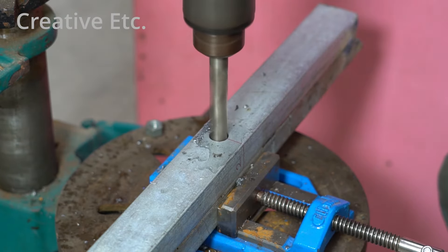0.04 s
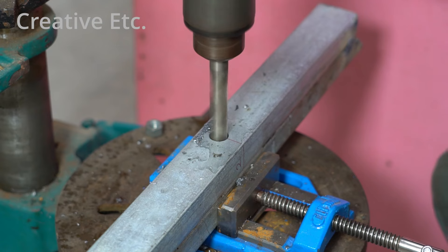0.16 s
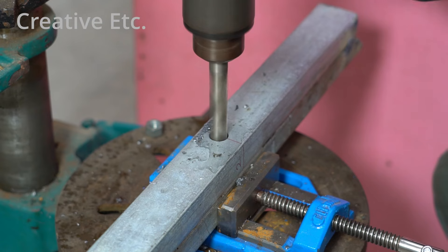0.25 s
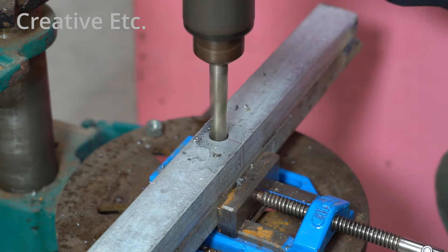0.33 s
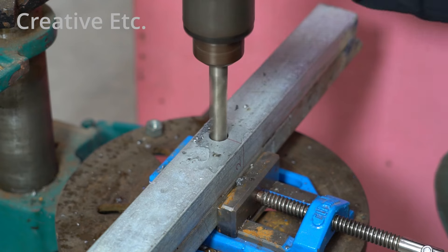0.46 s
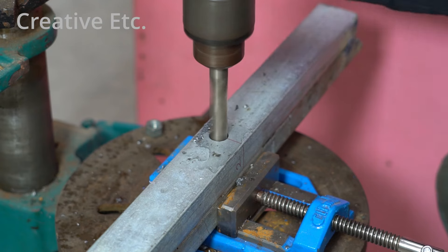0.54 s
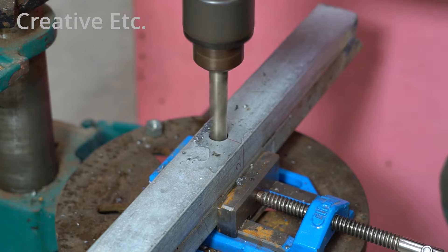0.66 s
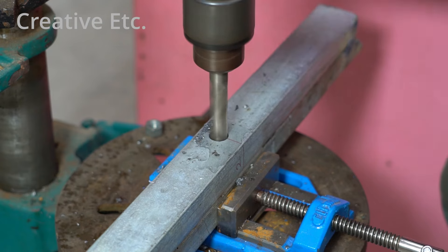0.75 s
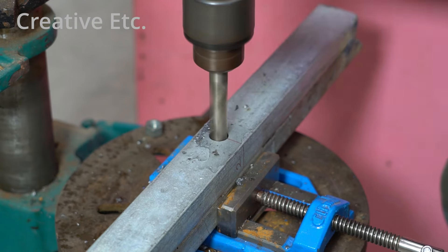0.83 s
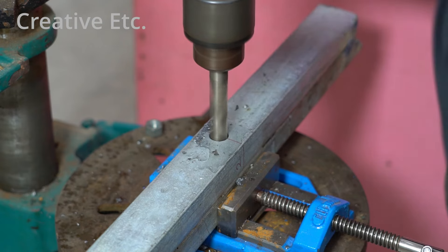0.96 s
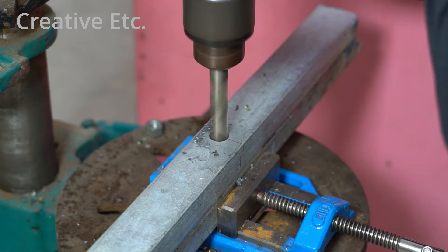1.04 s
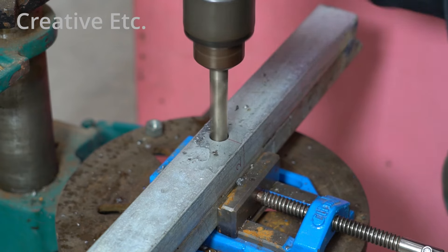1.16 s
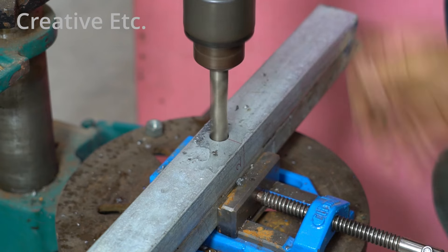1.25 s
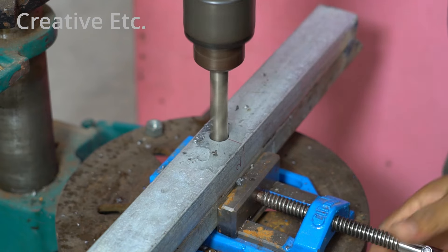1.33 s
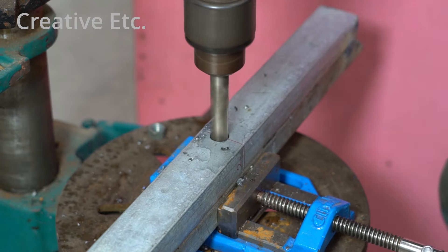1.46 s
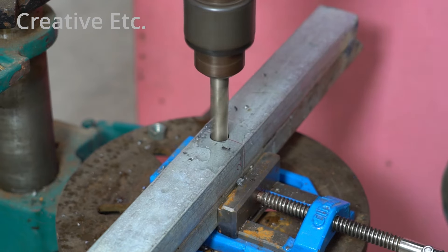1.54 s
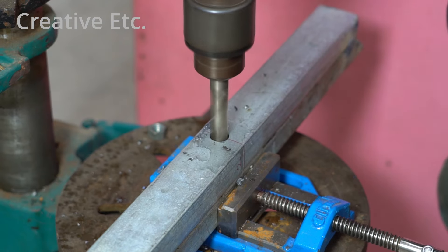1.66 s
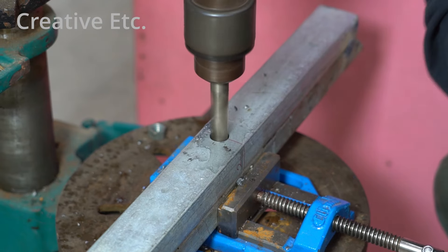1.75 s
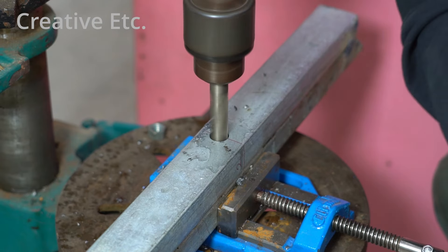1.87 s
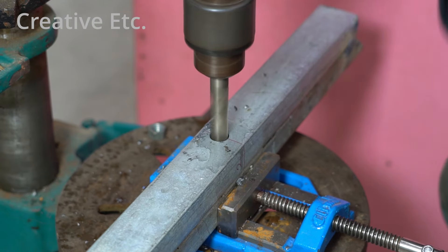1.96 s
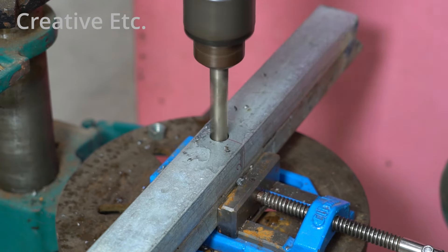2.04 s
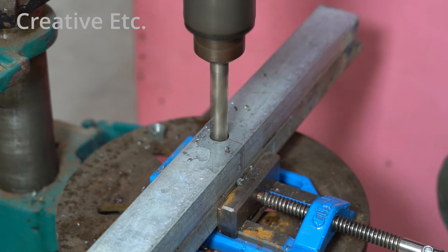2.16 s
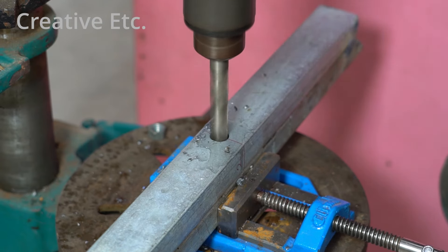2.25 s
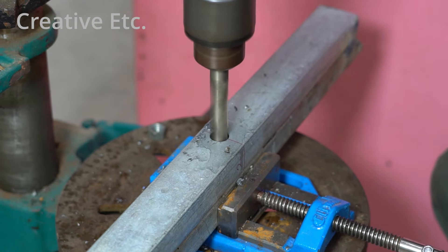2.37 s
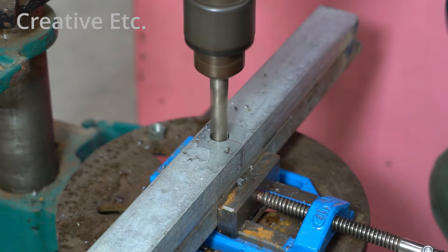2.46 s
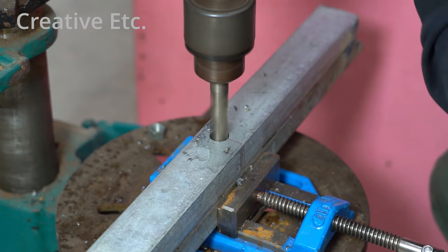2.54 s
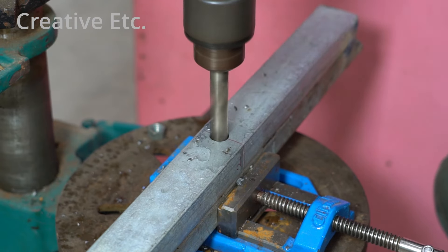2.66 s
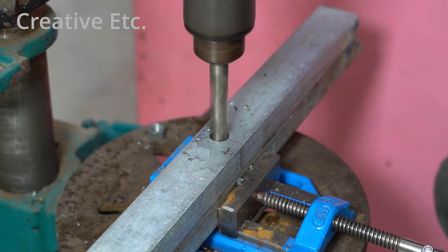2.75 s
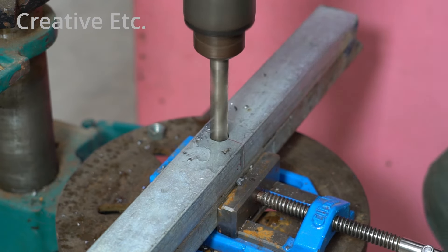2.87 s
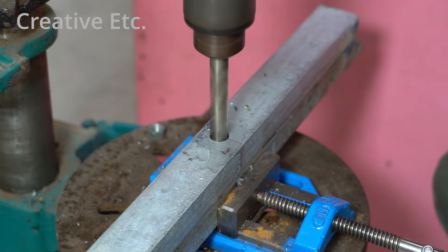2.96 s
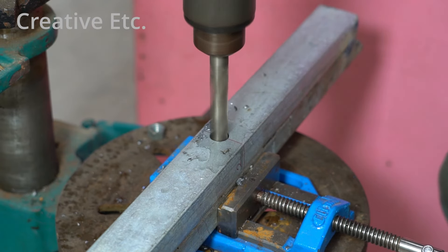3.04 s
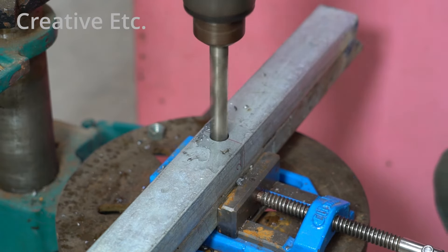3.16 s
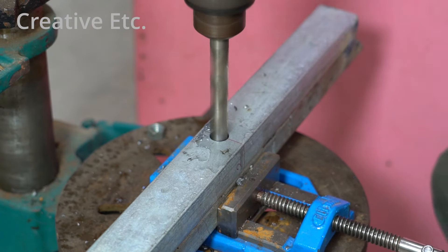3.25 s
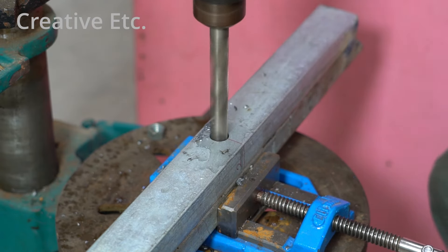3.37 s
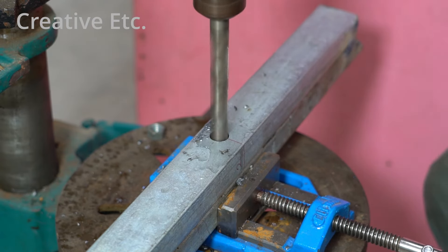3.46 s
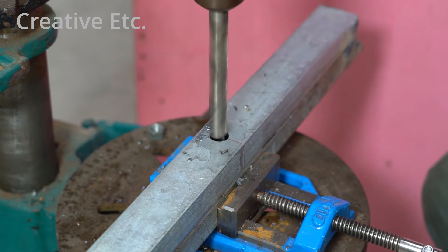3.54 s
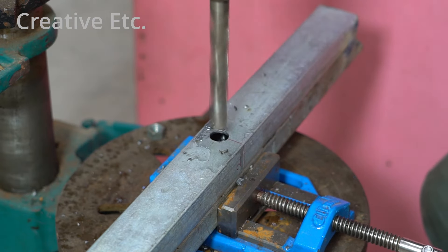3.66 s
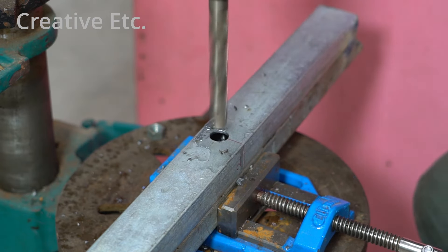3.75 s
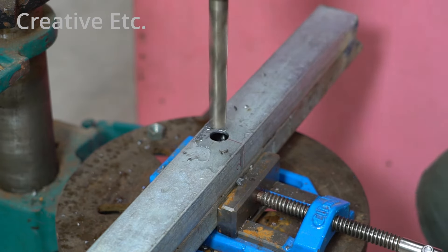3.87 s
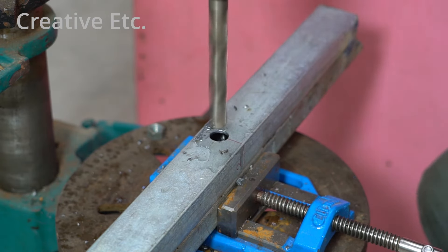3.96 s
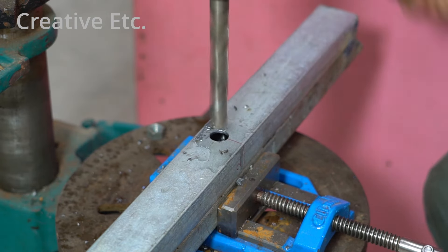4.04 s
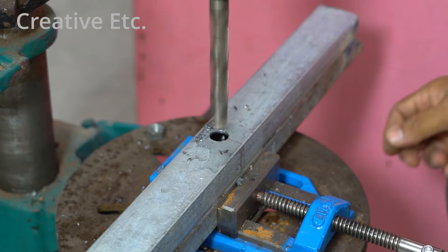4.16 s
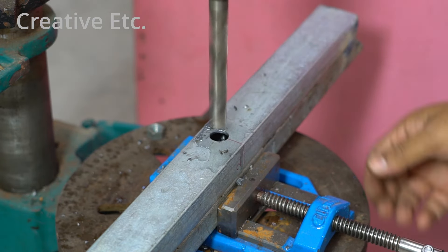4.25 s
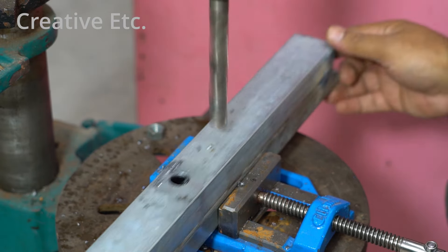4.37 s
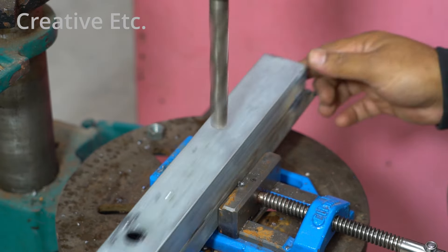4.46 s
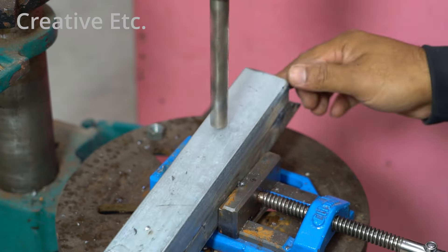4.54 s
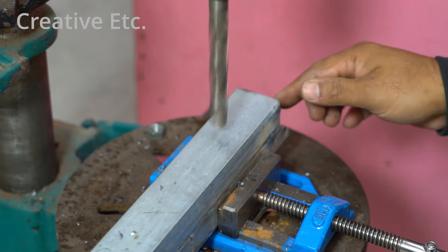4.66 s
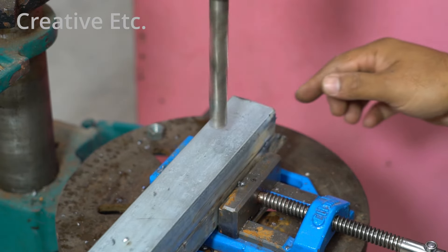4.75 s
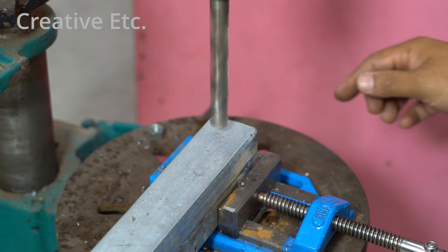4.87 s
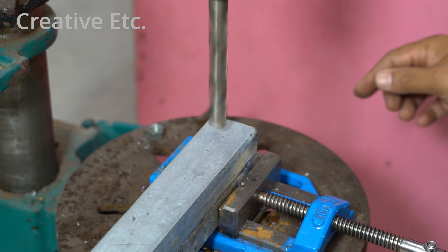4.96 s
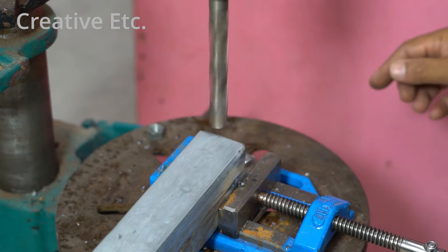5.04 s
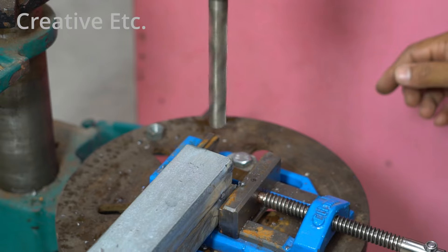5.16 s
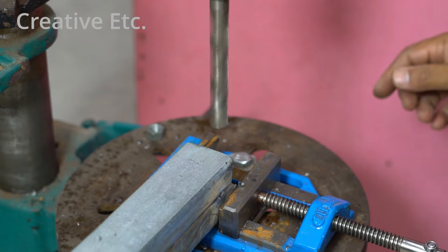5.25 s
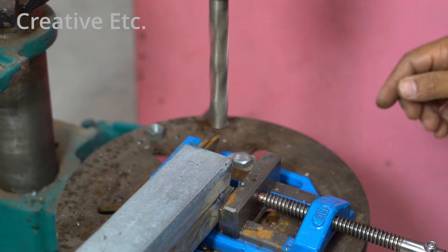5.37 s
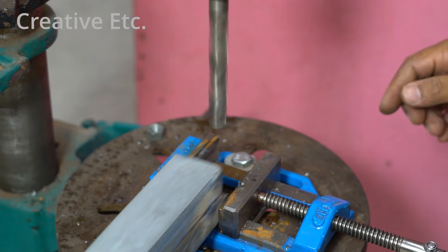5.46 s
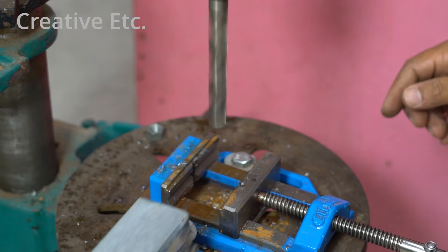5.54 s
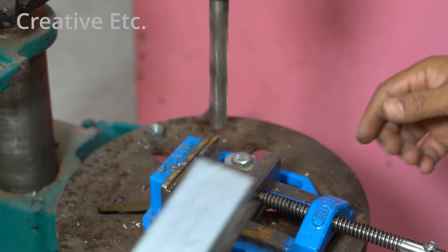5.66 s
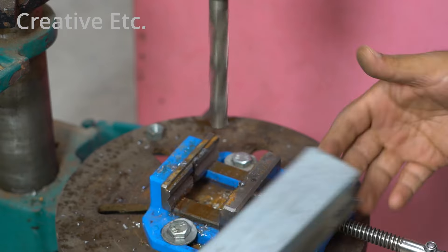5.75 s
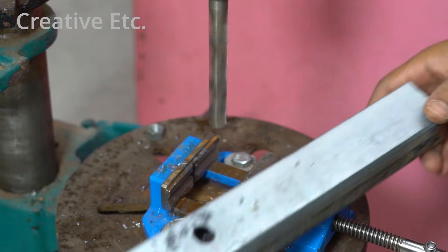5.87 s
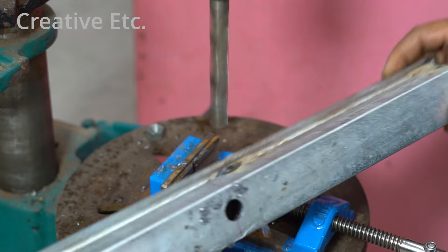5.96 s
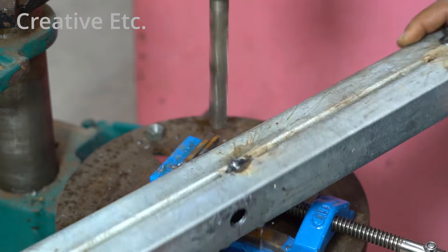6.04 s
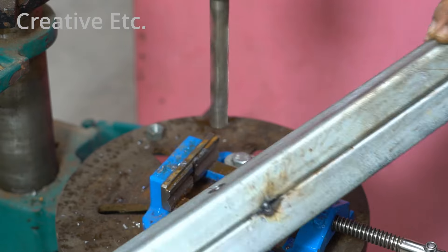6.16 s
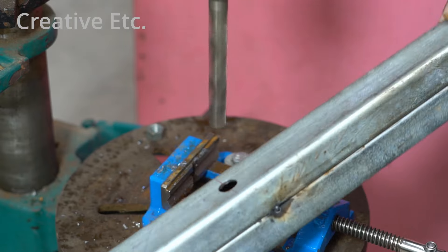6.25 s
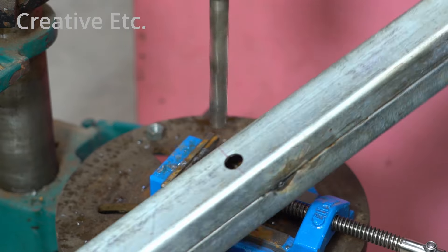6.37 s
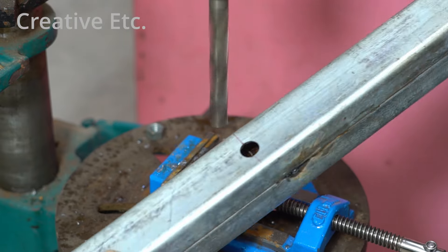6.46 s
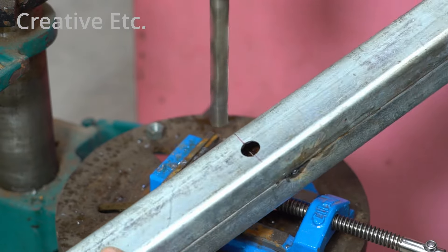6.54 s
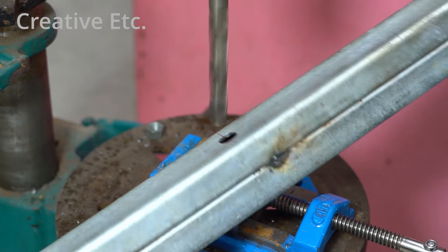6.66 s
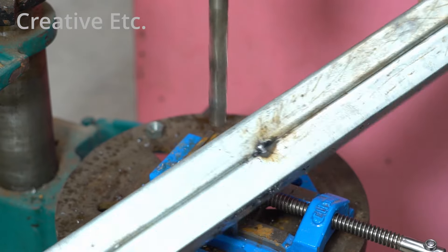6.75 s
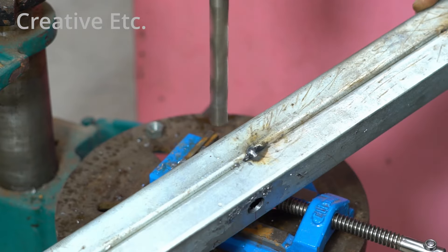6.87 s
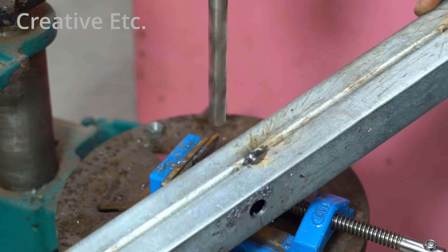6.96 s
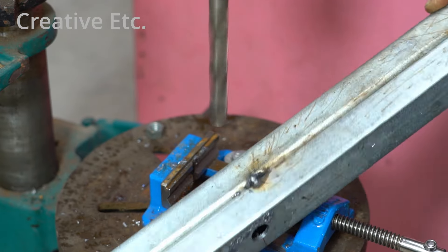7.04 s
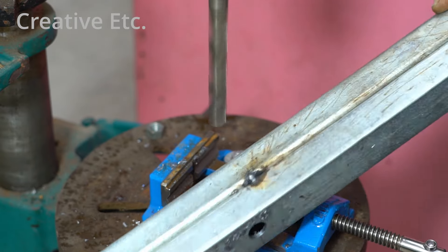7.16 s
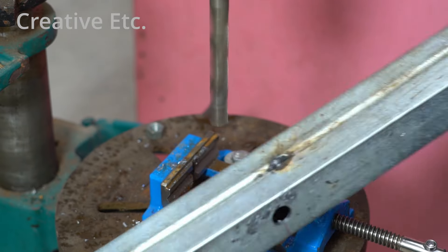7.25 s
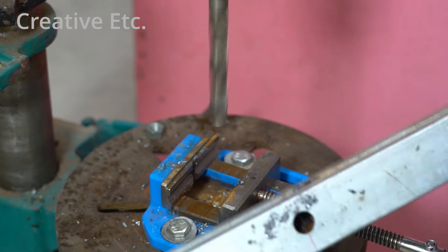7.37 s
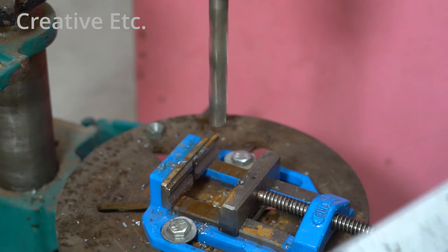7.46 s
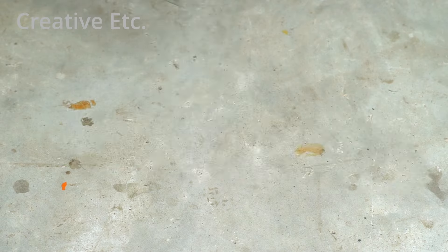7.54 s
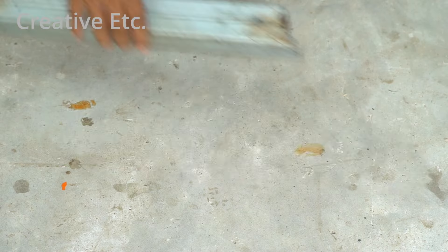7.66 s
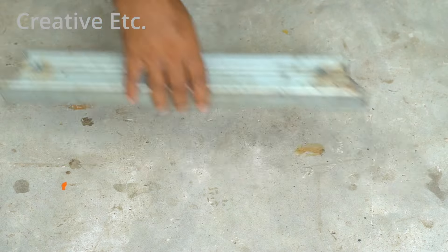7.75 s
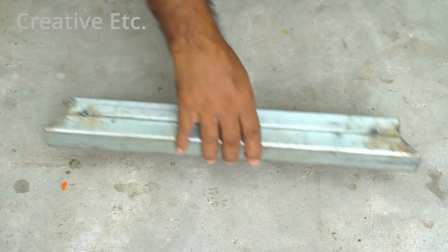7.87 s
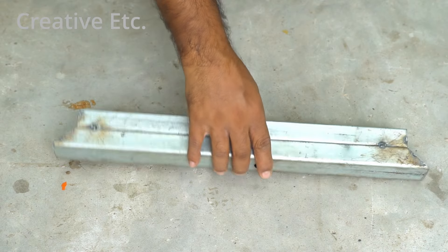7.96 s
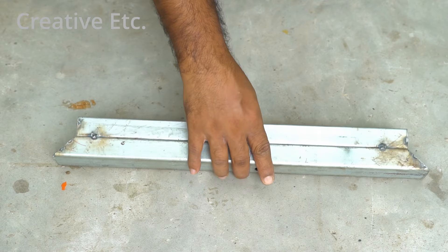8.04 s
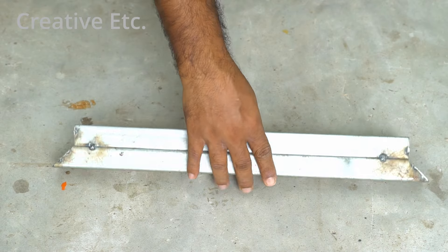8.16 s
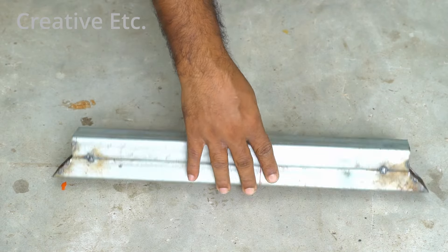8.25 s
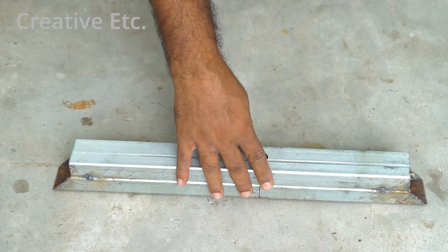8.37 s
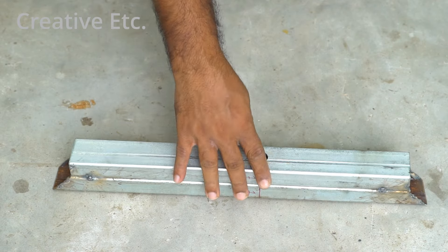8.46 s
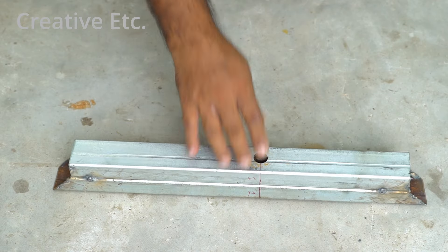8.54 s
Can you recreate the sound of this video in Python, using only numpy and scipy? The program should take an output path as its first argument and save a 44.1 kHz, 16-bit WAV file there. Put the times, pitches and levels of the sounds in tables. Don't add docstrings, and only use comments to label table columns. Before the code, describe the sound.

Close rattling drill noise with bursts of metallic shriek, easing to a humming idle, light metal taps, then a sudden quiet and a clanking tube.

```python
import sys
import numpy as np
from scipy import signal
from scipy.fft import rfft, irfft, next_fast_len
from scipy.io import wavfile
from scipy.ndimage import uniform_filter1d

SR = 44100
rng = np.random.default_rng(int(sys.argv[2]) if len(sys.argv) > 2 else 0)


def unload_wav(signal):
    wavfile.write(
        sys.argv[1],
        SR,
        np.round(np.clip(np.atleast_2d(signal).T, -1, 1) * 32767).astype(np.int16),
    )


def boost(x):
    u = np.asarray(x, float) / 20
    return 10 ** u


N = 379701
T = np.arange(N) / SR
CUT_S = 7.534

# frequency [Hz], level [dB per Hz].
HUM = [(30, -40.5), (80, -38), (200, -7.5), (320, -25.5), (380, -2), (520, 2.5), (640, -46.5), (900, -11.5)]
# frequency [Hz], level [dB per Hz].
BODY = [(330, -50.5), (560, -3.5), (814, -2), (1060, -4.5), (1610, -2), (1990, -8.5), (3600, -13.5),
        (4680, -17), (7920, -120)]
# frequency [Hz], level [dB per Hz].
SCRAPE = [(1760, -3.5), (3000, -5), (3490, -1.5), (5190, -4.5), (5840, -4.5), (8500, -13), (11000, -23.5),
          (18700, -120)]
# frequency [Hz], level [dB per Hz].
TOP = [(4120, -56), (7000, -7.5), (7710, -5), (9070, -6.5), (14900, -16.5), (16000, -22.5)]
# frequency [Hz], width [Hz], lift over the rattle [dB].
CASTING = [(412, 42, 7), (492, 32, 4), (823, 90, 3.5), (1455, 40, 4.5), (1587, 45, 4), (3150, 45, 3),
           (3570, 200, 3), (4130, 70, 2), (5850, 75, 1.5), (6890, 95, 1.5), (9320, 125, 2)]
# frequency [Hz], width [Hz], level [dB].
HUM_LINE = [(412, 26, 0), (823, 40, -9)]
# frequency [Hz], width [Hz], level [dB].
CUT_RING = [(1000, 100, -37.5), (1555, 220, -19.5), (1831, 34, 9.5), (2113, 62, 4), (2640, 370, -1.5)]
# frequency [Hz], width [Hz], level [dB].
BIT_RING = [(7680, 150, -17), (10160, 410, 4.5), (12000, 60, -18), (12900, 80, -3), (14670, 72, 7)]
# time in seconds, thrust shaking the casting in dB,
# scrape of the edges in dB, depth ringing the upper tube modes in dB.
FEED = [(0, -28, -31.5, 2.5), (.3, -29, -30, 1.5), (.65, -27, -30, 0.5), (.8, -26.5, -27.5, 5),
        (.95, -27.5, -29.5, 0.5), (1.4, -27.5, -30, -1), (1.52, -28, -33.5, 1), (1.6, -36, -32, -26),
        (1.84, -35.5, -37, 5.5), (2.1, -29, -32, -2), (2.47, -28.5, -31.5, 6), (2.8, -25, -30, -2),
        (3.2, -27.5, -28.5, 2), (3.56, -26.5, -28, -3), (3.64, -29.5, -36, -1.5), (3.9, -30, -40, 5),
        (6.5, -30.5, -35.5, 6), (7.53, -30.5, -35, 4)]
# start in seconds, hold in seconds, scrape rise in dB,
# squeal rise in dB, pitch rise in Hz.
BITES = [
    (0.725, .12, 2.5, 1, 39),
    (1.41, 0.11, 5, 1, 0.76),
    (1.541, 0.17, 4, 9.5, 124),
    (1.746, 0.059, 1.5, 4.5, 126),
    (2.012, 0.0304, 1.5, 5.5, 104),
    (2.474, 0.23, 1.5, 6.5, 100.5),
    (3.09, .2, .5, 3, 30),
    (3.3, 0.2, 0, 1, 5.2),
]
# start in seconds, peak level in dB.
SNAPS = [(0.1517, -16), (0.2016, -20), (0.2794, -30), (0.3293, -19), (0.5573, -20), (0.8456, -26),
         (0.8751, -17), (0.9803, -37), (1.109, -25.5), (1.342, -40), (1.4243, -11), (1.5113, -31),
         (1.578, -10), (1.6219, -10), (1.6573, -18), (1.9105, -19), (2.0284, -29), (2.378, -37),
         (2.4864, -18), (2.5962, -20), (2.649, -17.5), (2.753, -19), (3.3415, -23), (3.3918, -25),
         (3.5704, -16.5), (6.54, -25)]
# start in seconds, length in seconds, frequency in Hz, level in dB.
SINGS = [(.11, 0.13, 1834, -34), (.16, 0.14, 1625, -33), (.27, 0.31, 405, -34), (.27, 0.19, 505, -33.5),
         (0.404, 0.2, 1617, -38), (.42, .14, 1518, -31.5), (.67, 0.075, 1450, -31), (.66, .11, 1855, -30),
         (0.716, 0.06, 2100, -24), (.73, .1, 776, -33), (.81, 0.13, 1853, -29.5), (.93, 0.11, 800, -35),
         (.98, 0.22, 1840, -38), (1.0, .09, 496, -33), (1.1, 0.19, 822, -37.5), (1.34, 0.062, 448.5, -28.5),
         (1.48, 0.097, 796, -36), (2.72, 0.098, 1015, -33), (2.802, .16, 428.5, -32.5),
         (3.21, 0.11, 1780, -34), (3.271, 0.095, 2950, -30.5), (3.421, .18, 1830, -30),
         (3.5, .11, 1595, -30), (3.859, 0.3, 407, -38), (4.31, .2, 412, -40.5), (4.64, .09, 413, -35),
         (5.93, 0.37, 413, -37.5), (6.299, 0.31, 417, -38), (1.42, 0.13, 780, -39)]
# first thump in seconds, level in dB, number of turns.
BELT = [(0.111, -42, 8), (1.519, -56, 3), (2.07, -49, 1), (2.29, -48, 1), (2.43, -48, 1), (2.665, -59, 1),
        (2.83, -44, 1), (2.979, -43.5, 4), (3.705, -41, 4), (4.413, -41, 9), (5.933, -43, 1),
        (6.231, -40.5, 2), (6.66, -42.5, 1), (6.96, -39, 3)]
# lag after the turn starts in seconds, level in dB.
BELT_LUMPS = [
    (0, -11.5),
    (0.056, -12.5),
    (0.113, -19),
]
# start in seconds, peak level in dB.
CATCHES = [(0.5348, -32), (0.7089, -26), (0.744, -20), (0.7872, -11), (0.9109, -25), (0.9878, -24),
           (1.166, -18.5), (1.3634, -15), (1.419, -11), (1.4509, -11), (1.4826, -9.5), (1.615, -23),
           (1.645, -20), (1.6972, -21), (1.9152, -30), (2.0254, -11), (2.0908, -23), (2.3727, -17),
           (2.4833, -11.5), (2.6081, -16), (2.6465, -18), (2.6854, -10.5), (2.7217, -25), (3.145, -17),
           (3.26, -17), (3.3457, -15), (3.3946, -9.5), (3.4908, -28)]
# time in seconds, level in dB, crack in dB, free ring in seconds, damping in dB.
TAPS = [
    (7.067, -23, -8, 0.014, -12),
    (7.183, -18, -7, 0.014, -9),
    (7.276, -36, -2, .02, -6),
]
# frequency [Hz], level [dB], t60 [s].
TAP_MODES = [(824, -17, .05), (1455, 0, .11), (3025, -21, .5), (1010, -13, .04), (1628, -13, .3),
             (2120, -21, .06), (2950, -6, .035), (3025, -15, .9), (3600, -23, .06)]
# frequency [Hz], level [dB per Hz].
QUIET = [(30, 6.5), (90, -5), (200, -13.5), (600, -24), (1500, -25.5), (3500, -30.5), (8500, -32),
         (10500, -39), (16000, -52)]
# time in seconds, level in dB.
RUSTLE = [(7.534, -94), (7.6, -61), (7.66, -58.5), (7.77, -59.5), (7.8, -64.5), (7.9, -59.5), (7.97, -57.5),
          (8.08, -65), (8.25, -52), (8.33, -56), (8.45, -60), (8.6, -63)]
# start in seconds, peak level in dB.
STEPS = [
    (7.65, -39),
    (7.735, -39),
]
# time in seconds, level in dB, crack in dB, free ring in seconds, damping in dB.
DROPS = [
    (7.987, -13.5, -9, 0.01, -10.5),
    (8.027, -19.5, -1, 0.0081, -20),
]
# time in seconds, level in dB, crack in dB, free ring in seconds,
# damping in dB.
ROLLS = [
    (8.341, -46, 3, 0.012, -2),
    (8.35, -49, 2, .01, 2),
    (8.358, -53, 0, .01, 0),
    (8.366, -18.5, -3.5, 0.009, -22.5),
    (8.376, -27, -2, .008, -9),
    (8.384, -19.5, 2, 0.0076, -19),
    (8.393, -33, -2, .008, -8),
    (8.416, -40, -11, .01, -6),
]
# frequency [Hz], t60 [s], level when dropped [dB], level
# when rolled [dB].
TUBE = [(250, 0.18, -21.5, -12), (447, 0.49, -14, -6.5), (708, .08, -12, -6), (878, .1, -29, -16),
        (1020, 0.088, -4, -1.5), (1106, 0.41, -5, -2), (1300, 0.46, -3, -11), (1445, 0.06, -8, -5),
        (1510, .35, -9, -4), (1930, .1, -22, -8), (2106, 0.29, 2, -12), (2170, .1, -1.5, -7.5),
        (2326, 0.33, 3, -14), (2390, 0.16, -6, -5.5),
        (2650, .2, -4, -4), (2760, .08, -8, 0), (2970, .15, -20, -10), (3370, .3, -19, -3),
              (3800, .09, -15, -7), (3970, .15, -26, -9), (4270, .08, -23, -7), (4590, .14, -14, -10),
              (5100, .12, -28, -11), (6030, .1, -25, -18), (6550, .1, -32, -14), (6935, .45, -32, -12),
              (7450, .1, -30, -8), (8400, .1, -29, -18)]
# frequency [Hz], level [dB per Hz].
CRACK = [(90, -39), (200, 2.5), (700, 1), (2500, -3), (6000, -14.5), (9000, -25), (11500, -44),
         (15000, -57)]
# frequency [Hz], level [dB per Hz].
ROLL_CRACK = [(120, -40), (400, -8.5), (1500, -1), (2300, -3), (4200, -0.5), (7500, -9), (11000, -21),
              (14500, -40)]
# start in seconds, peak level in dB, fade in seconds.
GRATES = [
    (8.04, -44, .08),
    (8.343, -42, .03),
    (8.39, -32, .06),
]
# frequency [Hz], level [dB per Hz].
GRATE = [(300, -10), (1100, -5), (1500, -10), (3100, 0), (5500, -4), (7200, -6), (8500, -14), (12000, -32)]
# frequency [Hz], left minus right [dB].
PAN = [(60, 0.5), (380, 0.5), (2380, -0.5), (4400, 2.5), (8120, 0), (15000, 1.5)]
# start in seconds, length in seconds, how fully [0-1].
OPPOSED = [(.03, .25, .8), (.62, .1, .65), (.89, .09, .9), (1.1, .18, .9), (1.7, .04, .9), (2.03, .12, .75),
           (2.3, .14, .65), (2.6, .18, .7), (3.12, .12, .75), (3.52, .09, .7), (3.66, .2, .8),
           (4.21, .1, .95), (4.45, .17, .65), (4.72, .04, .95), (4.87, .2, .7), (5.15, .05, .85),
           (5.34, .19, 1), (5.7, .23, .8), (6.8, .07, .85), (6.96, .1, .75)]
# top of the region [Hz], turn between the channels [rad].
DROP_TURNS = [(650, 1.3), (900, 0), (1650, 2.95), (2000, -2.3), (2270, -1.7), (2550, -.3), (3550, -2.65),
              (4150, -1.1), (4750, 2.9), (5400, -.5), (6200, -2), (7900, -2.4), (23000, -1)]
# top of the region [Hz], turn between the channels [rad].
ROLL_TURNS = [(350, 1.2), (900, 2.1), (1700, 2.85), (2450, 0), (2900, -2.6), (3200, -1.9), (3550, -2.5),
              (4000, -1.6), (4550, -.9), (4750, 2.7), (6100, 1.9), (6700, 2.7), (23000, 0)]

BEAT_HZ, BEAT_DB, BEAT_SCATTER_DB = 39.4, 1.8, 1.3
HUM_DB, HUM_PER_THRUST, HUM_LINE_DB = -38, 0.84, -0.5
TOP_UNDER_DB, TOP_PER_SCRAPE, TOP_PER_BITE = -38, 0.61, 2.24
BITE_ATTACK_S, BITE_RELEASE_S = 0.014, 0.07
CUT_RING_DB, BIT_OUT_S, BIT_OUT_FADE_S = 3, 3.61, 0.22
SING_EDGE_S, SING_WAVER = 0.025, 0.012
BELT_TURN_S = 0.1812
SQUEAL_HZ, SQUEAL_DB, OVERTONE_DB, OVERTONE_PER_DB = 3612, -35, -17, 1.62
CATCH_FADE_S = 0.016
TAP_CONTACT_S, DROP_CONTACT_S, ROLL_CONTACT_S = 0.0024, 0.0072, 0.0054
TAP_LOW_HZ = 900
SCRAPE_SHARE = 1.1
ROOM_T60_S, ROOM_DB = 0.64, -12.5
RUMBLE_DB, RUMBLE_RISE_DB_S = -59.5, 15.5
WANDER_RAD, HOLD_S, BASS_HZ = 0.95, 0.11, 540
DROP_RESET_S, ROLL_RESET_S, LOCKED = 7.96, 8.335, 0.5
STREAK_DB = 2.5


def level(x, db=0):
    return x * boost(db) / np.sqrt(np.mean(x ** 2))


def peak(x):
    return x / np.abs(x).max()


def curves(table):
    s, *columns = np.transpose(table)
    return [np.interp(T, s, c) for c in columns]


def bell(hz, centre_hz, width):
    return 1 / (1 + (2 * (hz - centre_hz) / width) ** 2)


def shape(x, db_at):
    length = x.shape[-1]
    size = next_fast_len(length)
    hz = np.arange(size // 2 + 1) * SR / size
    return level(irfft(rfft(x, size) * boost(db_at(hz)), size)[..., :length])


def colour(x, points, peaks=()):
    hz, db = np.transpose(points)

    def db_at(at):
        slope = np.interp(np.log(at + 1), np.log(hz), db, left=-80, right=-80)
        return slope + sum(lift_db * bell(at, f, width) for f, width, lift_db in peaks)
    return shape(x, db_at)


def walk(rate, size=N):
    k = int(SR / rate)
    steps = np.repeat(rng.standard_normal(size // k + 1), k)
    return 2.1 * uniform_filter1d(uniform_filter1d(steps, k), k)[:size]


def flares(events, rise, fade):
    out, t = np.zeros(N), T[:6000]
    for s, peak_db in events:
        out[int(s * SR):][:6000] += boost(peak_db) * np.minimum(t / rise, 1) * np.exp(-t / fade)
    return out


def spindle_beat():
    turns = np.cumsum(BEAT_HZ * (1 + 0.01 * walk(6))) / SR
    size_db = BEAT_DB + BEAT_SCATTER_DB * rng.standard_normal(N // 500)
    return size_db[turns.astype(int)] * (2 * np.sin(np.pi * turns) ** 2 - 0.5)


def bites():
    start, hold, *rises = np.array(BITES).T[:, :, None]
    attack = (T - start) / BITE_ATTACK_S
    release = 1 - (T - start - hold) / BITE_RELEASE_S
    swell = np.clip(np.minimum(attack, release), 0, 1)
    return [np.sum(rise * swell, axis=0) for rise in rises]


def cutting():
    return np.clip(1 - (T - BIT_OUT_S) / BIT_OUT_FADE_S, 0, 1)


def rattle(shake_db, feel, own_db, channels=2):
    return rng.standard_normal((channels, N)) * boost(feel * shake_db + own_db * walk(14))


def rings(grain, modes):
    return shape(grain, lambda at: 10 * np.log10(sum(boost(2 * db) * bell(at, f, w) for f, w, db in modes)))


def motor_hum(shake_db, thrust_db):
    hum_db = HUM_DB + HUM_PER_THRUST * (thrust_db - np.mean(thrust_db))
    hum = colour(rattle(shake_db, 0.24, 1.2, channels=1), HUM, CASTING)
    lines = rings(rattle(shake_db, 0.2, 1.2, channels=1), HUM_LINE)
    return boost(hum_db) * (hum + boost(HUM_LINE_DB) * lines)


def cut_ring(shake_db, thrust_db, depth_db):
    out = np.zeros((2, N))
    for modes, db in ((CUT_RING[:2], -9.0 - 0.26 * depth_db), (CUT_RING[2:], depth_db - 6)):
        size = cutting() * boost(thrust_db + CUT_RING_DB + db + 0.5 * walk(5.03))
        out += size * rings(rattle(shake_db, 0.6, 1.3), modes)
    return out


def machine():
    thrust_db, scrape_db, depth_db = curves(FEED)
    bite_db = bites()[0]
    top_db = TOP_UNDER_DB + TOP_PER_SCRAPE * (scrape_db - np.mean(scrape_db)) + TOP_PER_BITE * bite_db
    shake_db = spindle_beat() + 0.84 * walk(110)
    body = boost(thrust_db + 1.0) * colour(rattle(shake_db, 0.29, 0.94), BODY, CASTING)
    scrape = boost(scrape_db + bite_db + 6.5) * colour(rattle(shake_db, 0.79, 0.33), SCRAPE, CASTING)
    top_size = boost(top_db) + 0.83 * flares(SNAPS, 0.0036, 0.004)
    top = top_size * colour(rattle(shake_db, 0.95, 0.2), TOP, CASTING)
    bit_size = cutting() * boost(top_db - 6.0 + 0.5 * depth_db)
    bit = bit_size * rings(rattle(shake_db, 1.3, 2.9), BIT_RING)
    return motor_hum(shake_db, thrust_db) + body + scrape + top + cut_ring(shake_db, thrust_db, depth_db) + bit


def sings():
    out = np.zeros((2, N))
    size = int(0.36 * SR)
    t = T[:size]
    for s, length, hz, db in SINGS:
        a = int(s * SR)
        edges = np.clip(np.minimum(t, length - t) / SING_EDGE_S, 0, 1)
        swell = edges * boost(db + 3 + 2 * walk(50, size=size))
        phase = 2 * np.pi * hz * np.cumsum(1 + SING_WAVER * walk(59.7, size=size)) / SR
        drift = np.array([0.6 * walk(25, size=size) for side in "LR"])
        out[:, a:a + size] += swell * np.sin(phase + drift)
    return out


def belt():
    push = np.zeros(N)
    for start, db, turns in BELT:
        for k in range(int(round(turns))):
            for lag, lump_db in BELT_LUMPS:
                at = start + k * BELT_TURN_S + lag - 0.012
                push[int(at * SR)] = boost(db + lump_db + 2.0 * rng.standard_normal())
    t = T[:4000]
    thud = np.sin(2 * np.pi * 100.4 * t) * t / 0.0075 * np.exp(1 - t / 0.0087)
    return 2.56 * signal.fftconvolve(push, thud)[:N]


def squeal():
    _, rise_db, rise_hz = bites()
    slip = np.array([0.55 * walk(250) + 1.3 * walk(12) for side in "LR"])
    waver = 1 + 0.0048 * walk(120) + 0.0054 * walk(5)
    phase = 2 * np.pi * np.cumsum((SQUEAL_HZ + rise_hz) * waver) / SR + slip
    overtones = np.sin(2 * phase) + boost(-8.0) * np.sin(3 * phase)
    tone = np.sin(phase) + boost(OVERTONE_DB + OVERTONE_PER_DB * rise_db) * overtones
    steady = boost(SQUEAL_DB + rise_db + 0.57 * walk(49)) * cutting()
    return tone * (steady + 0.78 * flares(CATCHES, 0.0037, CATCH_FADE_S))


def ring(x, hz, t60):
    pole = np.exp(2j * np.pi * hz / SR - np.log(1000) / (t60 * SR))
    return signal.lfilter([1], [1, -pole], x).imag


def strike(hits, modes, contact, crack_colour=CRACK):
    out = np.zeros(N)
    for s, db, crack_db, free, damped_db in hits:
        a = int((s - 0.01) * SR)
        t = T[a:] - s - contact
        touch = np.exp(-np.where(t < 0, (t / contact) ** 2, t / (0.18 * contact)))
        push = rng.standard_normal(N - a) * touch
        scrape = SCRAPE_SHARE * np.sqrt(contact * SR) / 4 * push
        body = 0
        for f, mode_db, t60 in modes:
            drive = touch * np.cos(2 * np.pi * (f * t + rng.random())) + scrape
            settled = np.clip((t - free * min(1, 3100 / f) ** 3) / 0.012, 0, 1)
            damp_db = damped_db * settled * max(1, f / 3100) ** 0.5
            waver_db = 2.5 * walk(56, size=N - a)
            body = body + boost(mode_db + damp_db + waver_db) * peak(ring(drive, f, t60))
        crack = colour(push, crack_colour)
        out[a:] += 4.15 * boost(db) * (peak(body) + boost(crack_db) * peak(crack))
    return out


def taps():
    dull = strike(TAPS[:1], TAP_MODES[:3], 2.2 * TAP_CONTACT_S)
    bright = strike(TAPS[1:], TAP_MODES, TAP_CONTACT_S)
    return signal.lfilter(*signal.butter(2, TAP_LOW_HZ, "high", fs=SR), dull + bright)


def room(x):
    t = T[:SR]
    tail = rng.standard_normal(SR) * boost(-60 * t / ROOM_T60_S) * np.clip(t / 0.032, 0, 1)
    dull = signal.lfilter(*signal.butter(2, 4000, fs=SR), tail)
    tail = dull + (tail - dull) * boost(-60 * t / 0.34)
    return x + boost(ROOM_DB) * signal.fftconvolve(x, tail / np.sqrt(np.sum(tail ** 2)))[:N]


def handling():
    since = np.maximum(T - CUT_S, 0)
    rustle = colour(rng.standard_normal((2, N)), QUIET[3:]) * boost(curves(RUSTLE)[0] + 1.0 * walk(30))
    rumble_size = boost(RUMBLE_DB + RUMBLE_RISE_DB_S * since) + flares(STEPS, 0.013, 0.017)
    rumble = colour(rng.standard_normal(N), QUIET[:4]) * rumble_size
    grate_size = sum(boost(db) * (T > s) * np.exp(-np.maximum(T - s, 0) / fade) for s, db, fade in GRATES)
    grate = colour(rng.standard_normal(N), GRATE) * grate_size * boost(1.9 * walk(70))
    return rustle + rumble + grate


def tube_on_floor():
    tube = np.array(TUBE)
    dropped = strike(DROPS, tube[:, [0, 2, 1]], DROP_CONTACT_S)
    rolled = strike(ROLLS, tube[:, [0, 3, 1]], ROLL_CONTACT_S, ROLL_CRACK)
    return dropped + rolled


def scene():
    press = machine() + sings() + belt() + squeal() + room(taps())
    floor = handling() + room(tube_on_floor())
    return press * np.clip((CUT_S - T) / 0.0015, 0, 1) + floor * (T >= CUT_S)


def channel_turn(f, t, loose):
    bass = WANDER_RAD * rng.uniform(-1.7, 1.7, 200)[(t / HOLD_S).astype(int)]
    for first, length, share in OPPOSED:
        bass = np.where((t >= first) & (t < first + length), np.pi * share, bass)
    turn = np.where(f < BASS_HZ, bass, 0)
    for first, regions in ((DROP_RESET_S, DROP_TURNS), (ROLL_RESET_S, ROLL_TURNS)):
        tops, turns = np.transpose(regions)
        turn = np.where(t >= first, turns[np.searchsorted(tops, f)], turn)
    jitter = uniform_filter1d(rng.standard_normal(turn.shape), 3) * np.sqrt(3)
    hold = np.where(t >= DROP_RESET_S, LOCKED, 1)
    return turn + loose * hold * np.clip(f / BASS_HZ, 0.5, 1) * jitter


def speed_change(x, start, loose=0.54):
    f, t, frames = signal.stft(x, SR, nperseg=1024, noverlap=768)
    f, t = f[:, None], t + start
    turn = channel_turn(f, t, loose)
    sides = np.array([0.5, -0.5])[:, None, None]
    streaks = uniform_filter1d(rng.standard_normal(turn.shape), size=12)
    streaks = np.sqrt(24) * uniform_filter1d(streaks, size=2, axis=0)
    streaks_db = STREAK_DB * (t < TAPS[0][0]) * streaks
    gain = boost(sides * np.interp(f, *np.transpose(PAN)) + streaks_db)
    turned = frames * gain * np.exp(1j * sides * turn)
    return signal.istft(turned, SR, nperseg=1024, noverlap=768)[1][:, :x.shape[1]]


def roll_off(x):
    return signal.sosfilt(signal.butter(12, 16720, fs=SR, output="sos"), x)


def record(dry):
    dry = signal.lfilter(*signal.butter(2, 55, "high", fs=SR), dry)
    dry = signal.sosfilt(signal.ellip(8, 0.2, 60, 15600, fs=SR, output="sos"), dry)
    cut = int(CUT_S * SR)
    wide = np.hstack([speed_change(dry[:, :cut], 0), speed_change(dry[:, cut:], CUT_S)])
    return roll_off(wide)


dry = scene()
out = record(dry)
unload_wav(out)
```